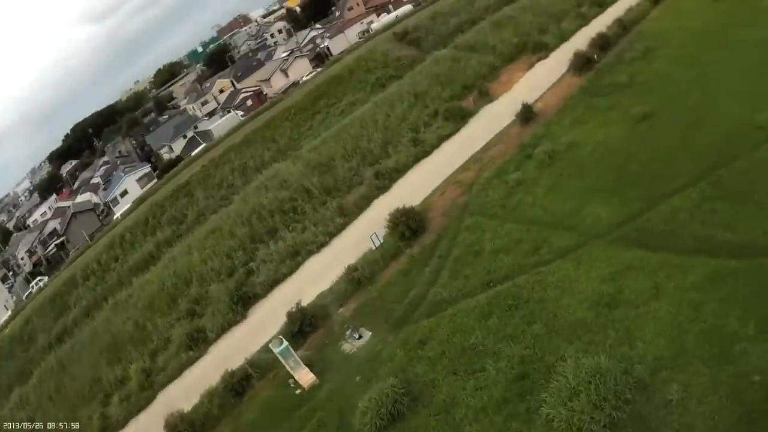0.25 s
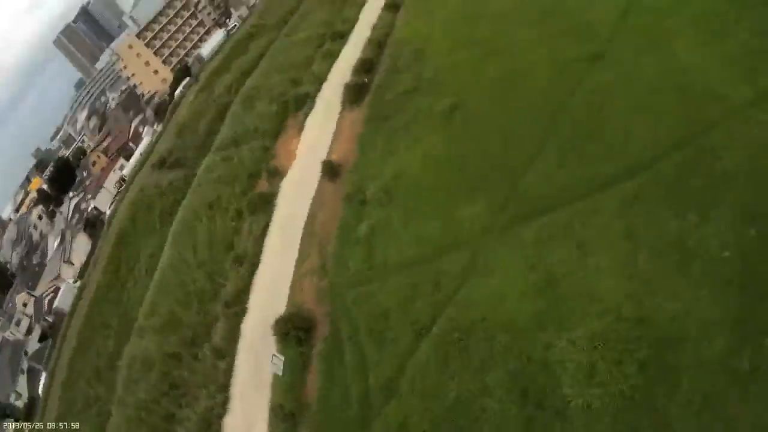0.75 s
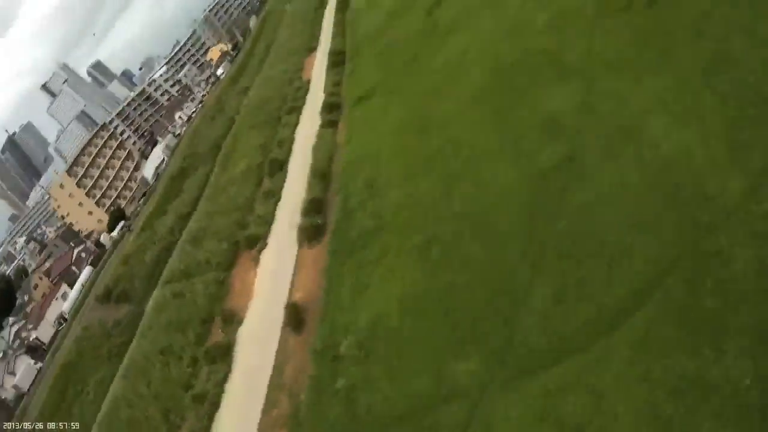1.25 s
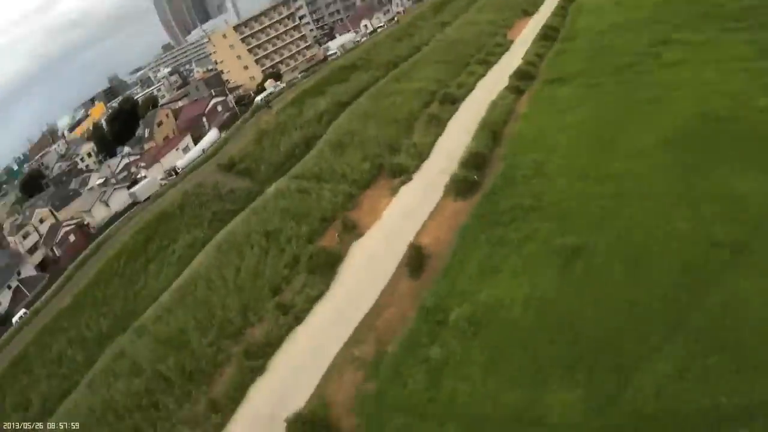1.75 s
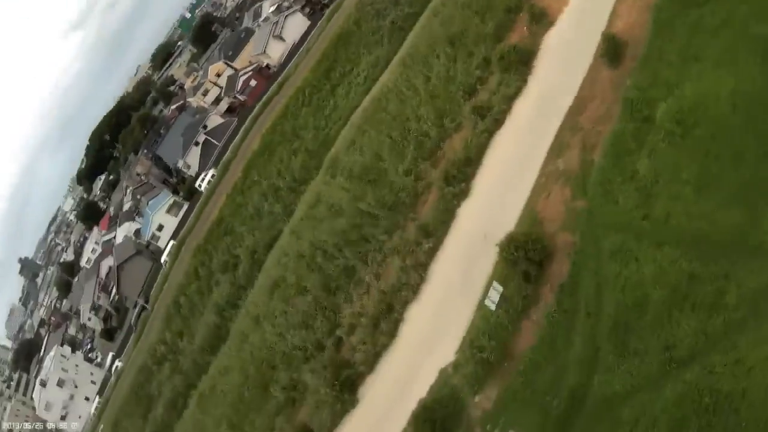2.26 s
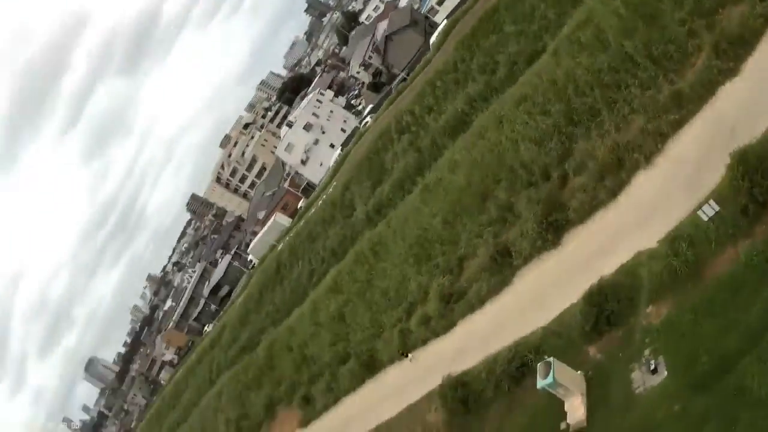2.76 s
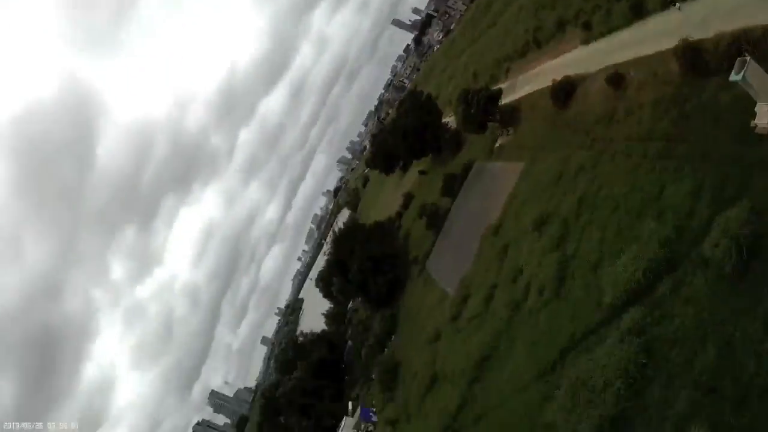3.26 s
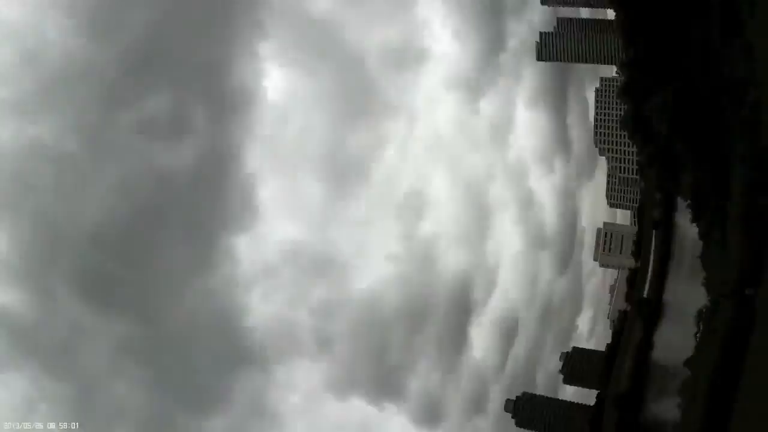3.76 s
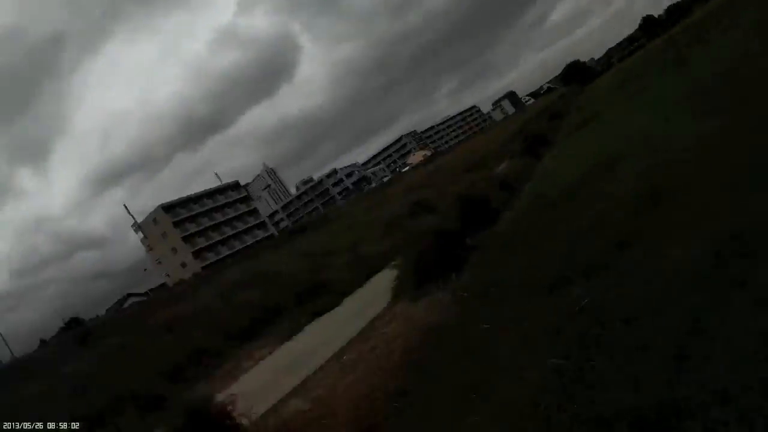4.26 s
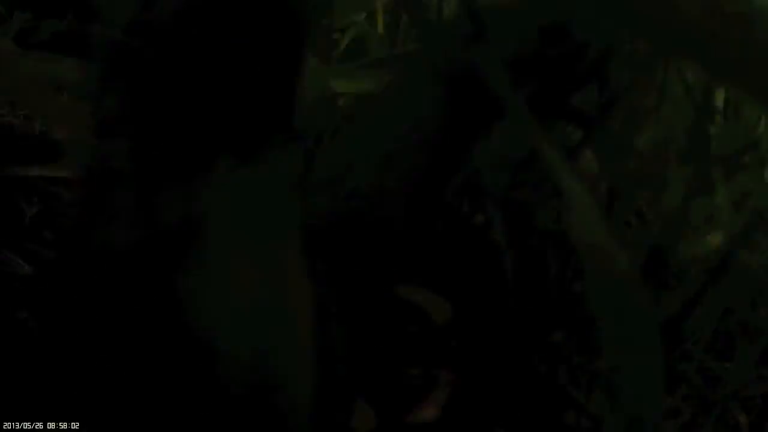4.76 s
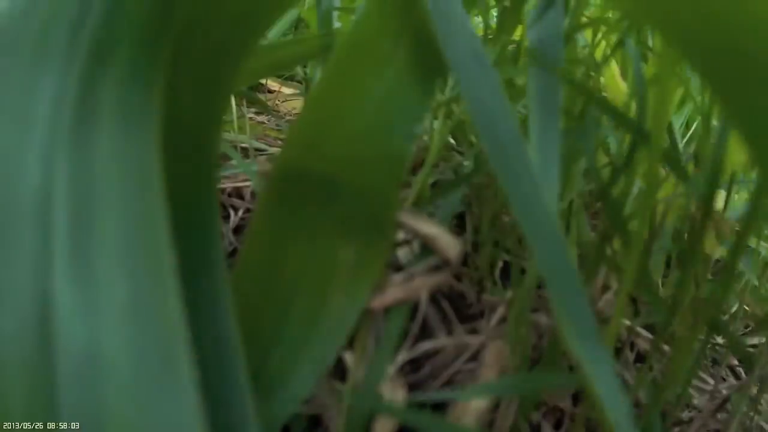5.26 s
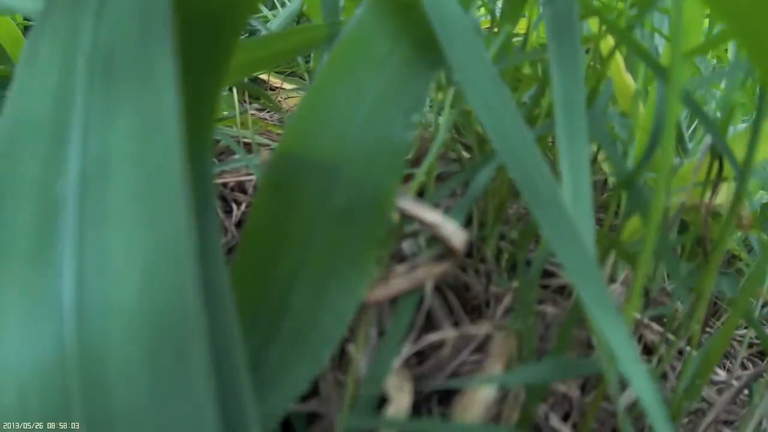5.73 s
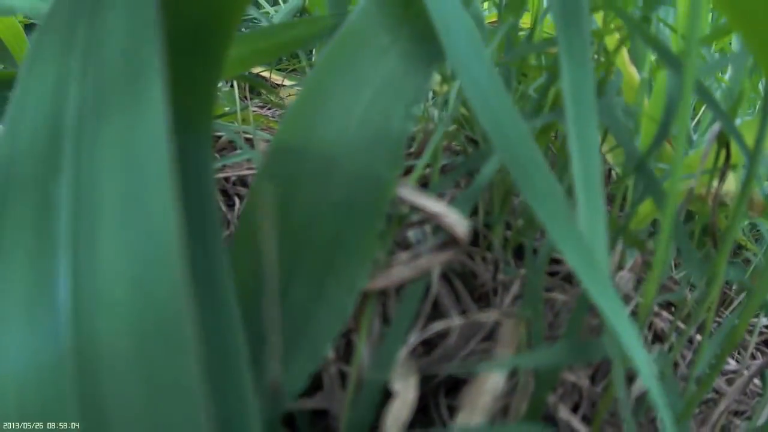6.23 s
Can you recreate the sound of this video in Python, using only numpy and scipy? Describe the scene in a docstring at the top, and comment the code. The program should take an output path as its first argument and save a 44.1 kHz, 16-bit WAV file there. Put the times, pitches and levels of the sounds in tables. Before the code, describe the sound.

An unbalanced drone drones and buzzes loudly right at its own camera microphone, blades chopping the wind and loose parts knocking. After almost four seconds the power drops, the pitch sags away, and gusts flutter through a much quieter fall. A short, clipped smash into stalks follows. Then only small sounds remain: a wavering very high motor whine, dull bumps, tiny metallic ticks and dry leaf crackle, close and outdoors with no echo.

```python
"""A quadcopter buzzes around its own small camera: an unbalanced rotor shakes the frame and rattles the mount.
Sines locked to the turns make the buzz; coloured noise makes the air, chopped by the blades; the input overloads.
The motors cut and spin down, air rushes past in the fall, noise bursts snap as the craft smashes into grass.
Stalled motor coils then whine, a tone with brief pitch dips, while the frame ticks, thumps and rustles in leaves."""
import sys
import numpy as np
from scipy import signal
from scipy.fft import rfft, irfft
from scipy.io import wavfile
from scipy.ndimage import uniform_filter1d

SR = 44100
rng = np.random.default_rng(int(sys.argv[2]) if len(sys.argv) > 2 else 0)


def waveform_to_disk(signal):
    """Save audio, clipped to [-1, 1], as 16-bit WAV at the path in sys.argv[1]."""
    frames = np.transpose(np.atleast_2d(signal))
    scaled = np.clip(frames, -1, 1) * 32767
    samples = np.round(scaled).astype(np.int16)
    wavfile.write(sys.argv[1], SR, samples)


N = 286193
TIME = np.arange(N) / SR


def from_db(db):
    """Gain of a dB value."""
    return 10 ** (np.asarray(db) / 20)


def rms_one(x):
    """Scaled to rms 1."""
    return x / np.sqrt(np.mean(x ** 2) + 1e-20)


def in_time(rows):
    """Columns joined by straight lines in time."""
    s, *columns = np.transpose(rows)
    return [np.interp(TIME, s, c) for c in columns]


def between(start_s, end_s, fade_s=0.013):
    """1 inside the span, ramping to 0 just outside it."""
    return np.clip(np.minimum(TIME - start_s, end_s - TIME) / fade_s + 1, 0, 1)


def humps(rows, column):
    """Bell-shaped swells as gain: centre s, width s at 1/e, peak dB in the given column."""
    return sum(from_db(row[column]) * np.exp(-4 * ((TIME - row[0]) / row[1]) ** 2) for row in rows)


def drift(rate_hz):
    """Lowpassed random wander, rms 1; the first second settles the filter and is dropped."""
    r = np.exp(-2 * np.pi * rate_hz / SR)
    wander = signal.lfilter([1], [1, -2 * r, r * r], rng.standard_normal(N + SR))
    return rms_one(wander[SR:])


def coloured(x, spectrum):
    """Shaped by a spectrum on a log-frequency axis; rms 1."""
    hz, db = np.transpose(spectrum)
    grid_hz = np.fft.rfftfreq(N, 1 / SR) + 1   # +1 avoids log of zero
    gain = from_db(np.interp(np.log(grid_hz), np.log(hz), db, left=-70, right=-70))
    return rms_one(irfft(rfft(x) * gain, N))


def noise(spectrum):
    """Smooth coloured noise, rms 1."""
    return coloured(rng.standard_normal(N), spectrum)


def clicks(rows, shift_db=0.0):
    """One-sample click per row of time in s, level in dB."""
    out = np.zeros(N)
    for s, db, *_ in rows:
        out[round(s * SR)] = from_db(db + shift_db)
    return out


def dying(x, t60_s):
    """Each click becomes an exponentially falling envelope."""
    return signal.lfilter([1], [1, -from_db(-60 / (t60_s * SR))], x + 1e-18)


# Unbalanced rotor under power. Each row: time in seconds, turns per second.
TURNS = [(0, 111.6), (.23, 108.9), (.49, 114.2), (.62, 113.5), (.67, 101.2), (.79, 106), (.91, 107),
         (1.15, 105.4), (1.38, 99.7), (1.55, 103.7), (2.0, 105.1), (2.24, 106.9), (2.38, 106), (3.2, 106.2),
         (3.33, 108.9), (3.57, 108), (3.69, 104.1)]
# Its levels. Each row: time in seconds, shake in dB, blade-pass in dB, upper orders in dB.
ROTOR_LEVELS = [(0, -23.5, -14, -21.5), (.55, -16.5, -10.5, -19.5), (.67, -7, -12.5, -17),
                (.85, -12.5, -11.5, -17.5), (1.15, -12, -15, -20), (1.4, -15.5, -16.5, -19.5),
                (1.9, -10, -16, -22.5), (2.25, -9.5, -17, -24.5), (2.5, -7, -9.5, -14.5),
                (2.85, -8.5, -12.5, -9.5), (3.05, -8.5, -19, -13), (3.25, -5.5, -27, -14.5),
                (3.55, -5, -11, -19.5), (3.68, -5.5, -9.5, -10), (3.73, -15.5, -26, -27),
                (3.85, -8, -18, -40), (3.95, -20, -18, -44), (4.08, -34, -39, -47)]
# Orders 3 to 14. Each row: multiple of the turn rate, level in dB relative to the upper-order level.
UPPER_ORDERS = [(3, 0), (4, -3), (5, -5.5), (6, -7.5), (7, -11), (8, -13), (9, -12.5), (10, -14.5),
                (11, -15), (12, -16), (13, -17.5), (14, -19)]
# Sharp edge ahead of the jolt, later behind it. Each row: time in seconds, lead in radians.
EDGE_LEAD = [(0, .6), (.63, .6), (.7, 1.1), (1.5, 1.1), (1.9, .45), (2.5, .35), (2.75, -.5), (4.08, -.5)]
# Another rotor. Each row: time in seconds, blade passes per second, fundamental level in dB.
OTHER_BLADE = [(0, 194, -15.5), (.3, 188, -17), (.6, 186, -13.5), (.75, 178, -19), (.92, 156, -18),
               (1.16, 168, -21), (1.4, 177, -21), (1.64, 183, -20.5), (1.85, 188, -18), (2.08, 174, -19.5),
               (2.72, 190, -15.5), (2.87, 176, -15.5), (3.08, 172, -11), (3.31, 188, -11.5),
               (3.57, 175, -20), (3.7, 149, -30), (3.89, 107, -13), (4.0, 66, -17), (4.08, 40, -32)]
# A third, farther rotor. Each row: time in seconds, blade passes per second, level in dB.
FAR_BLADE = [(0, 200, -35), (.15, 250, -26), (.3, 244, -18.5), (.45, 275, -27), (.6, 230, -18),
             (.7, 250, -40)]
JOLT_S = 2.1088   # a moment when the heavy side passes
CUT_S, DRAG_PER_S = 3.69, 7.6   # motors cut; air drag then slows the rotor as 1 / (1 + drag * time)
TOP_ORDERS_DB, TOP_FALL_DB = -19, 2.5   # orders 15 to 26: level of the first, fall per order


def rotors():
    """Sines on the turn; the upper ones form one sharp edge per turn, a drop at first, a rise later.

    Also gives the turn phase."""
    turns_hz = in_time(TURNS)[0] / (1 + DRAG_PER_S * np.maximum(TIME - CUT_S, 0))
    phase = 2 * np.pi * np.cumsum(turns_hz) / SR
    phase -= phase[round(JOLT_S * SR)]
    shake_db, pass_db, upper_db = in_time(ROTOR_LEVELS)
    lead = in_time(EDGE_LEAD)[0]
    slant = np.pi / 2 * np.tanh(lead * 2)   # a spike turns into a step as the edge leaves the jolt
    out = from_db(shake_db + 0.77 * drift(3.5)) * np.cos(phase)
    out += from_db(pass_db + 1.2 * drift(4.5)) * np.cos(2 * (phase + lead) - slant)

    upper = from_db(upper_db + 0.63 * drift(5.9))
    top_orders = [(15 + k, TOP_ORDERS_DB - TOP_FALL_DB * k) for k in range(12)]
    for multiple, db in UPPER_ORDERS + top_orders:
        out += upper * from_db(db) * np.cos(multiple * (phase + lead) - slant)

    passes_hz, blade_db = in_time(OTHER_BLADE)
    blade = 2 * np.pi * np.cumsum(passes_hz * (1 + 0.0042 * drift(11))) / SR
    harmonics = sum(from_db(-7.0 - 4.1 * k) * np.cos(k * blade) for k in range(2, 8))
    out += from_db(blade_db + 2.55 * drift(9.3)) * (np.cos(blade) + harmonics)

    far_hz, far_db = in_time(FAR_BLADE)
    out += from_db(far_db) * np.cos(2 * np.pi * np.cumsum(far_hz) / SR) * between(0, 0.64)
    # sqrt(2) makes the sine levels rms
    return -np.sqrt(2) * out * between(0, 4.08, fade_s=.04), phase


# Air in flight, fall and smash. Each row: time in seconds, buffeting in dB, rush in dB, hiss in dB.
AIR_LEVELS = [(0, -19.5, -17.5, -20.5), (.6, -16.5, -18, -18.5), (.9, -14, -12.5, -19),
              (1.25, -20, -18, -21.5), (1.85, -24.5, -20.5, -22.5), (2.5, -20, -19.5, -22.5),
              (2.84, -22, -10, -21.5), (3.25, -17.5, -11, -19.5), (3.68, -15, -10, -21.5),
              (3.78, -11, -18.5, -36), (3.95, -25, -32.5, -42.5), (4.1, -15, -30.5, -46),
              (4.25, -27.5, -22.5, -43.5), (4.4, -26, -16, -40), (4.468, -19, -11.5, -35),
              (4.49, 1.5, -12, -15), (4.515, -7, -12, -13.5), (4.538, -3, 5.5, -6),
              (4.584, -12, -29.5, -33), (4.63, -33, -40, -46)]
# Gusts. Each row: centre in seconds, width in seconds, buffeting in dB, rush in dB.
GUSTS = [(.38, 0.13, -10.5, -30), (.69, 0.064, -6, -18), (2.4, 0.15, -15, -25), (3.23, 0.041, -8.5, -16),
         (3.6, 0.064, -13, -19), (3.977, 0.018, -5.5, -20), (4.039, 0.031, -13, -25),
         (4.135, 0.033, -25, -13.5), (4.22, 0.074, -30, -15)]
# Buffeting spectrum, also used for the rumble in the grass. Each row: Hz, relative dB per Hz.
BUFFET_SPECTRUM = [(15, 8), (40, -6.5), (90, 0), (150, -6.5), (300, -12.5), (600, -25)]
# Rush spectrum. Each row: Hz, relative dB per Hz.
RUSH_SPECTRUM = [(71, -42), (120, -1), (192, 4.5), (252, 0.5), (1900, -10), (4290, -29), (5730, -43),
                 (7250, -44), (9000, -38.5), (11700, -91), (19800, -120)]
# Hiss spectrum. Each row: Hz, relative dB per Hz.
HISS_SPECTRUM = [(1060, -28), (1800, -3.5), (2040, 0.5), (3700, -5), (4550, -6), (5350, -9), (5910, -11.5),
                 (7020, -15), (11700, -24), (14200, -38), (15500, -50)]


def air(phase):
    """Buffeting, rush and hiss; the turning blades chop rush and hiss, eddies make them lumpy."""
    buffet_db, rush_db, hiss_db = in_time(AIR_LEVELS)
    turn = phase - 1.0
    chop_shape = np.cos(turn) + 0.32 * np.cos(2 * turn)
    chop = from_db(4.9 * between(0.91, 3.75) * chop_shape)
    buffet_level = np.hypot(from_db(buffet_db + 1.6 * drift(8.3)), humps(GUSTS, column=2))
    buffet = buffet_level * noise(BUFFET_SPECTRUM)
    rush_level = np.hypot(from_db(rush_db + 0.75 * drift(9.0)), humps(GUSTS, column=3))
    rush = rush_level * from_db(1.26 * drift(100)) * noise(RUSH_SPECTRUM)
    hiss_level = from_db(hiss_db + 0.73 * drift(11.6) + 0.72 * drift(104))
    hiss = hiss_level * housing(noise(HISS_SPECTRUM))
    return (buffet + chop * rush + np.sqrt(chop) * hiss) * between(0, 4.62)


# Loud knocks of the mount. Each row: time in seconds, relative level in dB.
LOUD_KNOCKS = [(0.6649, -7.5), (0.6948, -12.5), (0.716, -8.5), (0.7632, -12), (0.857, -16), (0.924, -11.5),
               (0.9977, -24), (1.0547, -8.5), (1.6487, -12), (1.754, -14), (1.8025, -11.5), (1.8881, -13),
               (1.9364, -13.5), (1.965, -13.5), (2.0406, -13), (2.089, -17), (2.135, -10), (2.183, -11.5),
               (2.2394, -14), (2.2865, -22), (2.3148, -14), (2.401, -13.5)]
# Knock spectrum. Each row: Hz, relative dB per Hz.
RATTLE_SPECTRUM = [(500, 12), (2000, 2), (4000, 4), (5300, -2), (6700, 2), (8000, -16.5), (12000, -10),
                   (15500, -27)]


def rattle(phase):
    """Each jolt knocks the mount by a random strength: a noise burst that swells within a millisecond."""
    jolts = np.diff(np.floor((phase - .5) / (2 * np.pi)), prepend=1e9) > 0
    strength_db = -27.0 + 2.6 * np.minimum(rng.exponential(1, N), 3)
    knocks = from_db(strength_db) * jolts * between(0.44, 3.72) + clicks(LOUD_KNOCKS, 6.9)
    envelope = dying(dying(knocks, 0.0066), 0.0036) / 15
    return housing(envelope * noise(RATTLE_SPECTRUM))


# Knocks in the fall, snaps of stalks and plastic.
# Each row: time in seconds, peak in dB before overload, colour in Hz, t60 in seconds.
SNAPS = [(3.881, -15.5, 930, 0.019), (4.026, -19, 1059, 0.017), (4.209, -13, 1190, 0.02),
         (4.434, -14, 937, 0.018), (4.442, -24, 904, 0.02), (4.478, -2.5, 2360, 0.023),
         (4.488, -5, 980, 0.017), (4.5, 8, 2260, 0.011), (4.507, -1, 1810, 0.017), (4.52, 2, 1170, 0.014),
         (4.531, 31, 1920, 0.017), (4.542, 5.5, 2500, 0.03), (4.558, 7, 1600, 0.0059),
         (4.655, -15.5, 2090, 0.061), (4.67, -12, 2130, 0.016), (4.738, 6, 1020, 0.0064),
         (4.814, -15.5, 1290, 0.031), (4.903, -21, 1400, 0.028), (5.032, -9, 2280, 0.0088),
         (5.111, -10.5, 2700, 0.012), (5.372, -15.5, 926, 0.045), (5.384, -11, 1570, 0.029),
         (5.392, -16, 1990, 0.023), (5.4, -12, 1840, 0.029), (5.527, -23, 2900, 0.022),
         (5.545, -19, 2790, 0.047), (5.799, -13, 1350, 0.026), (6.04, -22, 3230, 0.015),
         (6.257, -33, 5830, 0.013), (6.297, -29, 3290, 0.0097), (6.383, -31, 5870, 0.018)]


def snaps():
    """Short dying noise bursts through a broad band round each colour."""
    out = np.zeros(N)
    for s, db, hz, t60_s in SNAPS:
        age_s = np.arange(4000) / SR
        burst = rng.standard_normal(4000) * from_db(-60 * age_s / t60_s)
        band_hz = [hz / 1.85, min(hz * 2.25, 9000)]
        burst = signal.sosfilt(signal.butter(2, band_hz, "band", fs=SR, output="sos"), burst)
        at = round(s * SR)
        out[at:at + 4000] += from_db(db) * burst / np.abs(burst).max()
    return out


# Swells of the coil whine. Each row: centre in seconds, width in seconds, relative level in dB.
SWELLS = [(4.65, .035, -36), (4.727, 0.064, -28), (4.86, 0.1, -39), (4.94, 0.047, -21.5),
          (5.02, 0.077, -19), (5.13, 0.07, -17), (5.265, .1, -20), (5.36, 0.076, -22),
          (5.425, 0.086, -20.5), (5.556, 0.088, -21), (5.635, 0.056, -24), (5.765, 0.1, -20),
          (5.895, 0.088, -13.5), (6.035, 0.081, -13.5), (6.13, 0.11, -20.5), (6.225, .09, -16.5),
          (6.33, 0.073, -17.5), (6.395, 0.073, -17), (6.5, 0.086, -21)]
# How much the whine shivers. Each row: time in seconds, unsteadiness 0 to 1.
UNSTEADY = [(4.6, .4), (5.07, .38), (5.14, .22), (5.22, .36), (5.55, .45), (5.65, .26), (5.85, .2),
            (6.05, .12), (6.49, .22)]
# Moments when the whine, probably coils beating together, slips half a cycle back, in seconds.
WHINE_SLIPS_S = [4.888, 5.02, 5.2, 5.265, 5.305, 5.555, 5.665, 5.715, 5.828, 5.942, 6.065, 6.158, 6.249,
                 6.338, 6.425]
# Noise round the tone, leaning low. Each row: Hz, relative dB per Hz.
SHIVER_SPECTRUM = [(8200, -20), (8700, -6), (9050, -1), (9200, -1), (9400, -24)]
WHINE_HZ, WHINE_FLOOR_DB = 9134, -34.5


def whine():
    """A switching tone in the coils: each slip dips its pitch briefly; noise makes it shiver."""
    level = from_db(WHINE_FLOOR_DB) + humps(SWELLS, column=2)
    share = in_time(UNSTEADY)[0]
    slips = clicks([(s, 0) for s in WHINE_SLIPS_S])
    lag = np.pi * np.cumsum(uniform_filter1d(uniform_filter1d(slips, size=70), size=50))
    tone = np.cos(2 * np.pi * WHINE_HZ * TIME - lag + .2 * drift(5))
    flutter = from_db(9.4 * share * drift(40))
    shiver = share ** 2 * from_db(3.9 * drift(40)) * noise(SHIVER_SPECTRUM)
    return level * (np.sqrt(2) * flutter * tone + 2.16 * shiver) * between(4.59, 7, fade_s=0.0043)


# Bouts of the frame bumping the leaves, also heaving the rumble in the grass.
# Each row: start in seconds, length in seconds, first bump in dB, last bump in dB.
BOUTS = [(4.595, 0.12, -11.5, -19), (4.679, .07, -10, -14), (4.755, 0.063, -15, -13),
         (4.892, .014, -14, -16), (5.025, 0.055, -11.5, -12), (5.113, .005, -23, -24),
         (5.189, 0.066, -15, -27), (5.317, .005, -17, -26), (5.371, 0.017, -17, -11),
         (5.425, 0.1, -11, -20), (5.595, 0.032, -15.5, -18), (5.647, 0.055, -15, -9),
         (5.752, .005, -20, -26), (6.254, 0.065, -14, -19.5), (6.405, .028, -18, -18)]
BUMP_GAP_S, BUMP_LOW_HZ, BUMP_HIGH_HZ, BUMP_SPREAD_DB = .0125, 65.4, 155.5, 6.5


def thumps():
    """Each bump is one soft swing out and back; they follow one another quickly within a bout."""
    out = np.zeros(N)
    for start_s, length_s, first_db, last_db in BOUTS:
        late_s = -BUMP_GAP_S   # the first step lands on zero
        for step, pitch, loud in rng.random((12, 3)):
            late_s += BUMP_GAP_S * (0.76 + 0.6 * step) if late_s >= 0 else BUMP_GAP_S
            if late_s > length_s:
                break
            hz = BUMP_LOW_HZ + (BUMP_HIGH_HZ - BUMP_LOW_HZ) * pitch
            turn = np.arange(0, 1.2, hz / SR)
            swing = np.sin(2 * np.pi * turn) * np.exp(-1.2 * turn) * np.minimum(8 * (1.2 - turn), 1)
            bump_db = first_db + (last_db - first_db) * late_s / length_s
            bump_db += BUMP_SPREAD_DB * (2 * loud - 1.5)
            at = round((start_s + late_s) * SR)
            out[at:at + len(swing)] += from_db(bump_db) * swing
    return out


# Strong motor twitches. Each row: time in seconds, strength in dB.
TWITCHES = [(4.6552, -28), (4.6707, -25), (4.736, -20), (4.8677, -26), (4.978, -35), (5.3656, -30),
            (5.385, -20), (5.569, -24), (5.867, -29), (5.9079, -36), (5.9445, -28), (5.9882, -31),
            (6.032, -31), (6.1079, -30), (6.257, -25), (6.3584, -28), (6.403, -33)]
# Ringing of the motor bell. Each row: Hz, relative dB, t60 in seconds.
BELL_MODES = [(5830, 1, 0.017), (7550, -4, 0.008), (2300, -16, 0.014)]
FAINT_TICKS_PER_S, FAINT_TICK_DB = 24, -35.5


def ticks():
    """Each twitch rings the motor bell briefly, a sum of damped modes; faint ones come at an uneven pace."""
    faint_at = np.diff(np.floor(FAINT_TICKS_PER_S * TIME + .3 * drift(8.0)), prepend=1e9) > 0
    faint = faint_at * from_db(FAINT_TICK_DB + 3.8 * rng.standard_normal(N)) * between(4.1, 7)
    strikes = clicks(TWITCHES) + faint + 1e-18
    out = np.zeros(N)
    for hz, db, t60_s in BELL_MODES:
        r, w = from_db(-60 / (t60_s * SR)), 2 * np.pi * hz / SR
        out += from_db(db) * signal.lfilter([0, np.sin(w)], [1, -2 * r * np.cos(w), r * r], strikes)
    return out


# Leaves settling. Each row: time in seconds, level in dB.
SETTLING = [(4.6, -42), (4.7, -34.5), (5.02, -36.5), (5.3, -47), (5.5, -41.5), (5.8, -44.5), (6.2, -46),
            (6.49, -47.5)]
# Rustles. Each row: centre in seconds, width in seconds, level in dB.
RUSTLES = [(4.65, .05, -31), (4.82, 0.063, -35), (5.22, 0.07, -43.5), (5.395, 0.067, -28.5),
           (5.475, 0.05, -37), (5.575, 0.13, -33), (5.88, .08, -39.5), (6.07, 0.11, -50),
           (6.25, 0.054, -38.5), (6.38, 0.033, -38)]
# Leaf spectrum. Each row: Hz, relative dB per Hz.
LEAF_SPECTRUM = [(180, -36), (300, -16.5), (556, -4), (1110, -12), (1530, -10), (1810, -7), (5720, -12.5),
                 (7170, -13), (8600, -15), (11200, -37), (18900, -120)]
RUMBLE_DB, RUMBLE_UNDER_BUMPS_DB, RUMBLE_LINGERS_S = -46.5, -23, 0.016


def grass():
    """Leaves crackle in random noise grains over a faint rumble that heaves with the bumps."""
    stir = np.hypot(from_db(in_time(SETTLING)[0]), humps(RUSTLES, column=2))
    heaves = []
    for s, length_s, first_db, last_db in BOUTS:
        heave_db = (first_db + last_db) / 2 + RUMBLE_UNDER_BUMPS_DB
        heaves.append((s + length_s / 2, length_s + RUMBLE_LINGERS_S, heave_db))
    rumble_level = from_db(RUMBLE_DB) + humps(heaves, column=2)
    grain_at = rng.random(N) < 900 / SR   # about 900 per second
    grains = from_db(6.4 * np.minimum(rng.exponential(1, N), 5)) * grain_at
    crackle = coloured((dying(grains, 0.0062) + 3.6) * rng.standard_normal(N), LEAF_SPECTRUM)
    leaves = stir * from_db(1.67 * drift(47)) * crackle
    rumble = rumble_level * from_db(6.5 * drift(18)) * noise(BUFFET_SPECTRUM)
    return (leaves + rumble) * between(4.59, 7)


# Camera housing resonances. Each row: Hz, width in Hz, lift in dB.
HOUSING = [(4630, 230, 3.5), (5830, 300, 4.5), (7830, 890, 4)]


def housing(x):
    """Camera housing colours the sound: resonant peaks are added to it."""
    out = x
    for hz, width_hz, db in HOUSING:
        peak = signal.lfilter(*signal.iirpeak(hz, hz / width_hz, fs=SR), x)
        out = out + (from_db(db) - 1) * peak
    return out


def scene():
    """All sources at the one microphone."""
    shake, phase = rotors()
    flight = shake + air(phase) + rattle(phase)
    return (flight + snaps() + whine() + thumps() + ticks() + grass())[None]


OVERLOAD, KNEE, CUTOFF_HZ = .72, 9, 15725   # ceiling of the flat tops, sharpness of the bend, top cut


def record(dry):
    """The input overloads with flat tops; a coupling capacitor blocks the deepest lows; the top is cut."""
    flat = dry / (1 + np.abs(dry / OVERLOAD) ** KNEE) ** (1 / KNEE)
    flat = signal.sosfilt(signal.butter(1, 6.0, "high", fs=SR, output="sos"), flat)
    return signal.sosfilt(signal.ellip(10, .5, 70, CUTOFF_HZ, fs=SR, output="sos"), flat)


dry = scene()
out = record(dry)
waveform_to_disk(out)
```